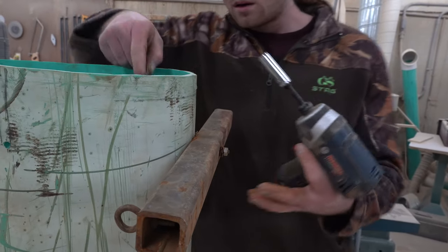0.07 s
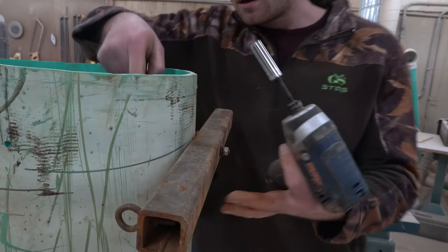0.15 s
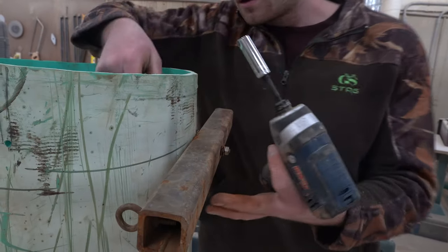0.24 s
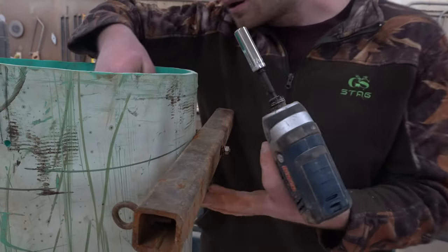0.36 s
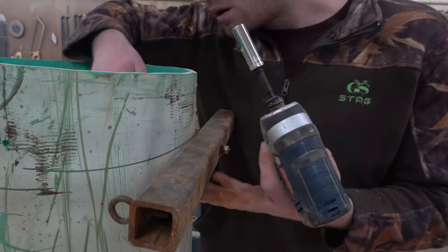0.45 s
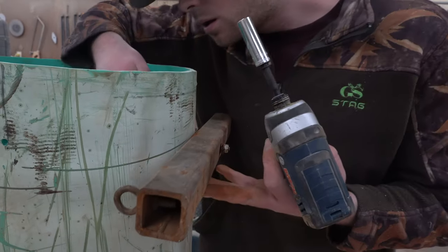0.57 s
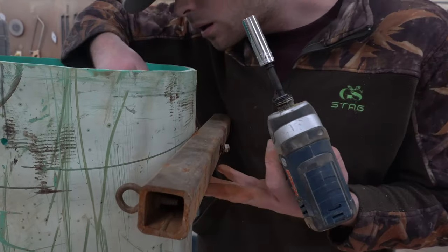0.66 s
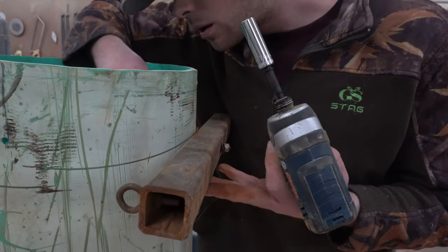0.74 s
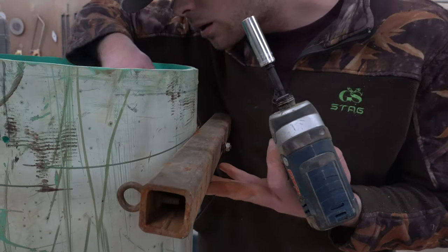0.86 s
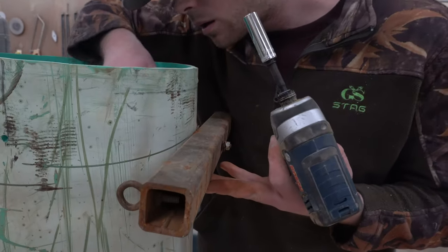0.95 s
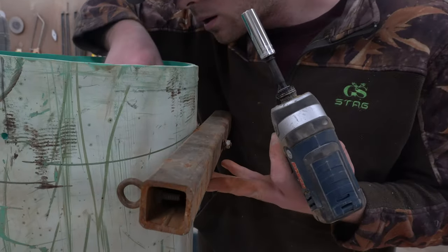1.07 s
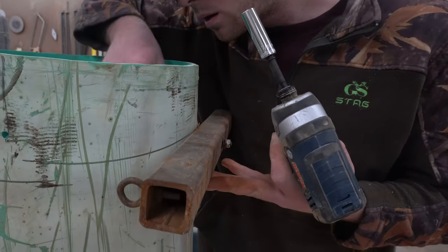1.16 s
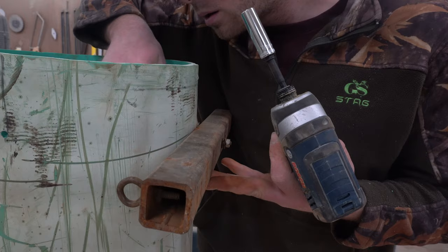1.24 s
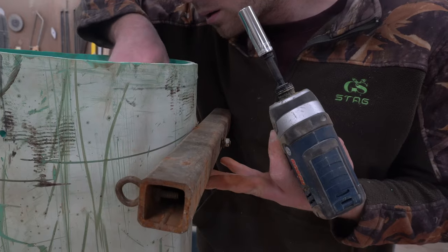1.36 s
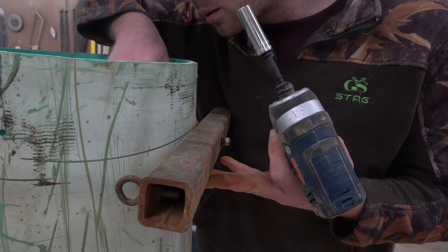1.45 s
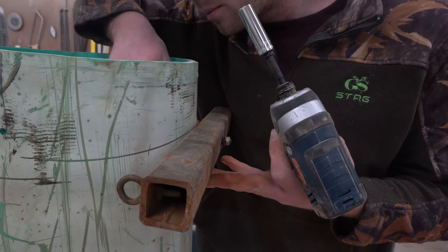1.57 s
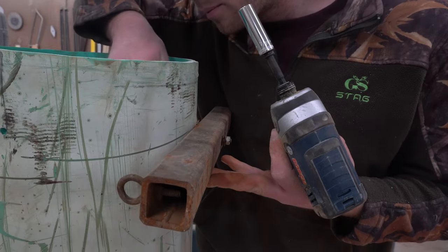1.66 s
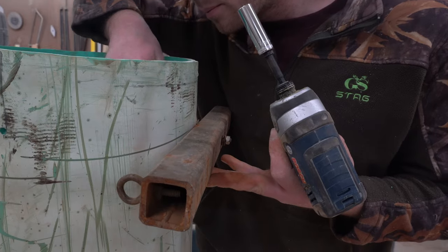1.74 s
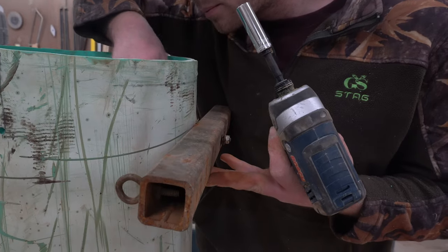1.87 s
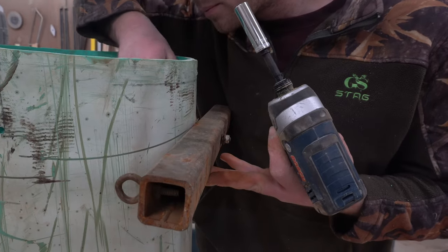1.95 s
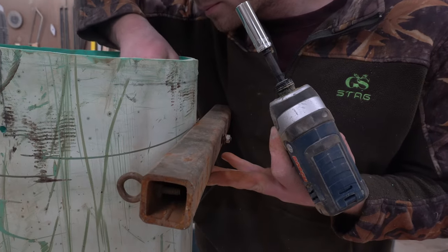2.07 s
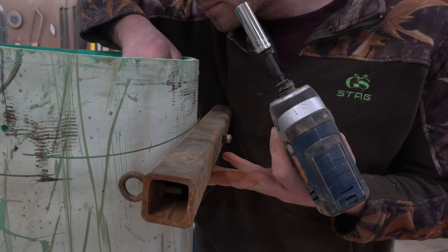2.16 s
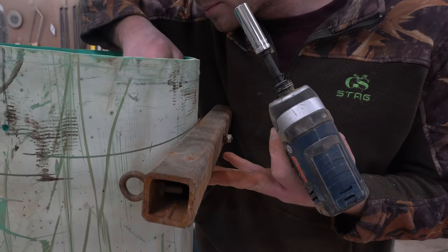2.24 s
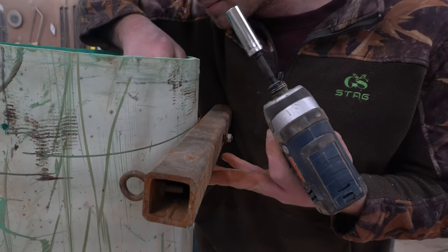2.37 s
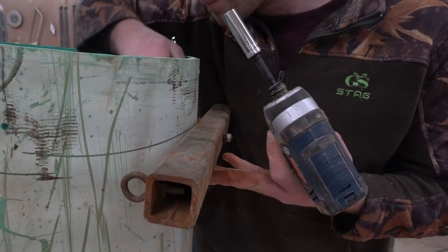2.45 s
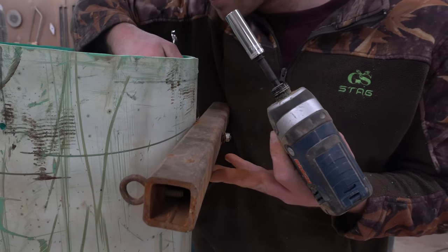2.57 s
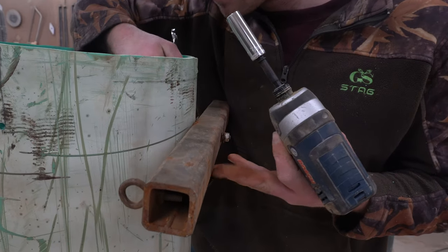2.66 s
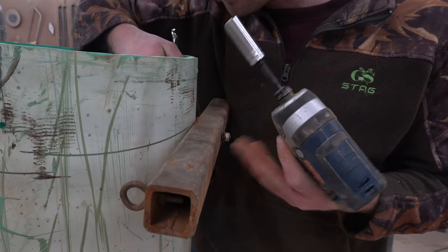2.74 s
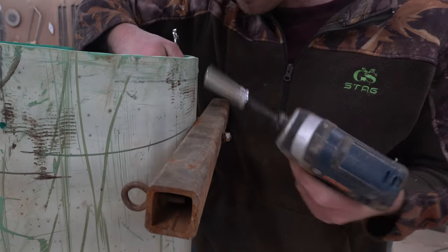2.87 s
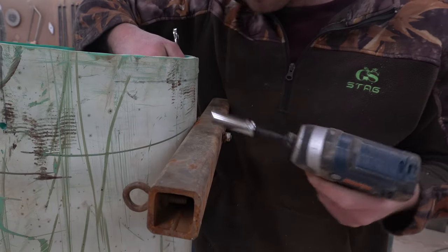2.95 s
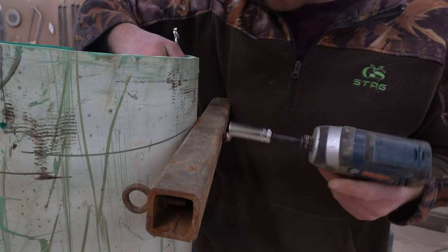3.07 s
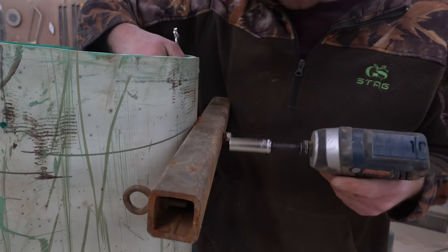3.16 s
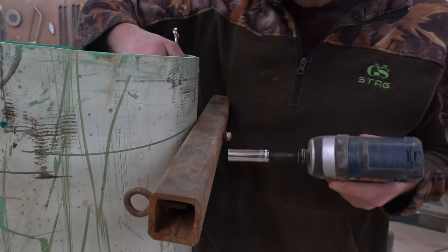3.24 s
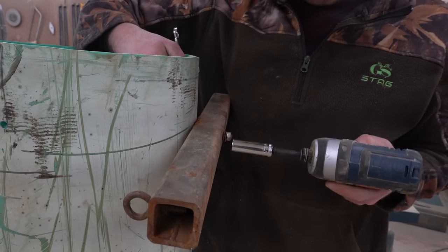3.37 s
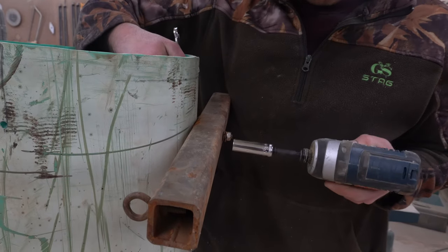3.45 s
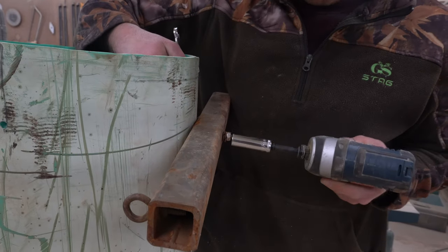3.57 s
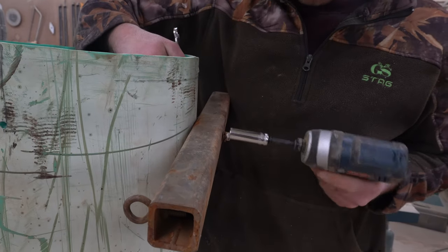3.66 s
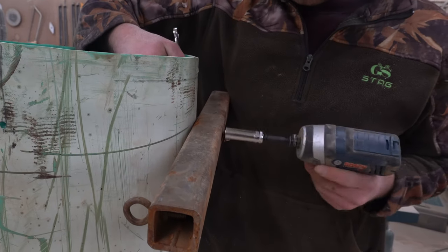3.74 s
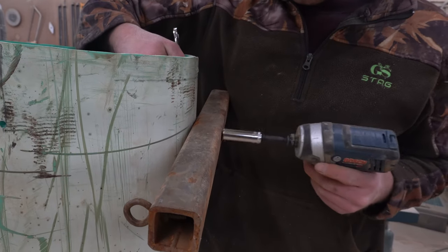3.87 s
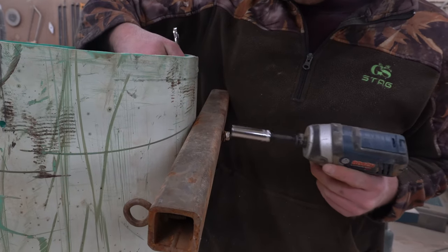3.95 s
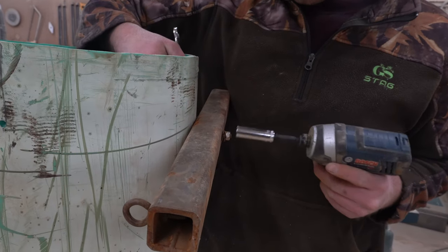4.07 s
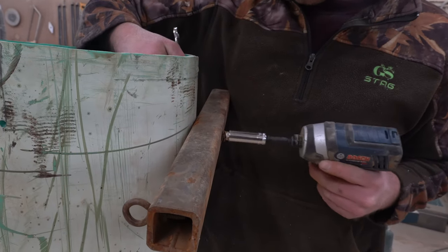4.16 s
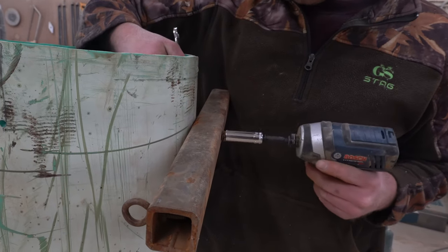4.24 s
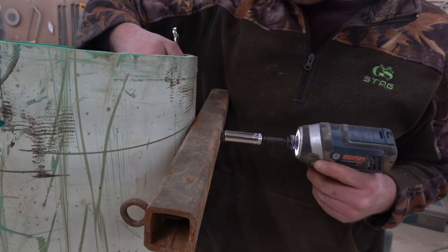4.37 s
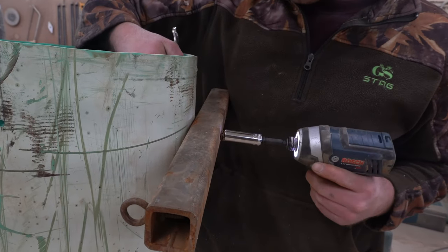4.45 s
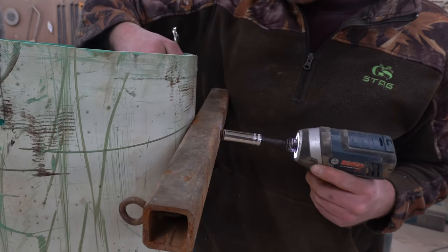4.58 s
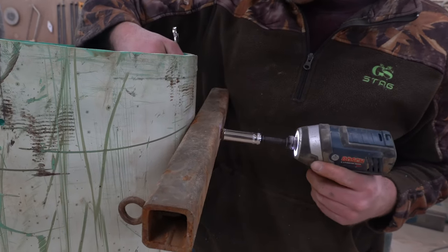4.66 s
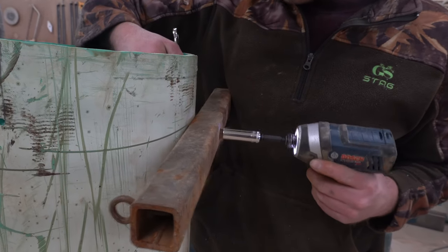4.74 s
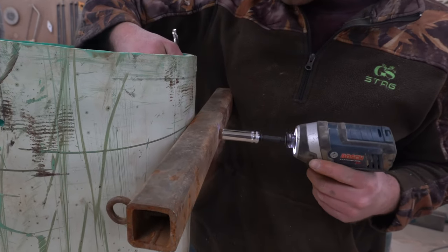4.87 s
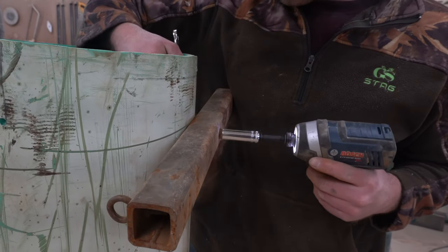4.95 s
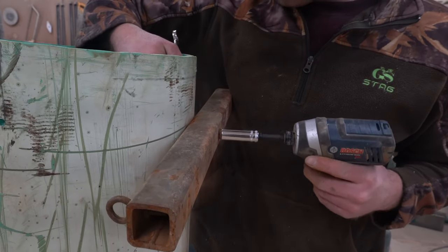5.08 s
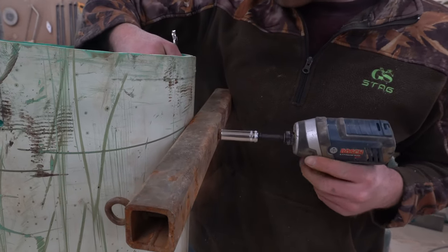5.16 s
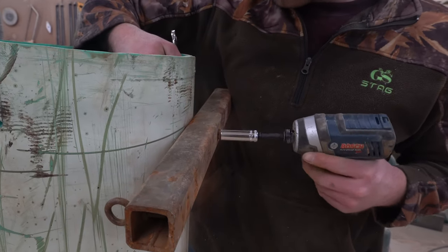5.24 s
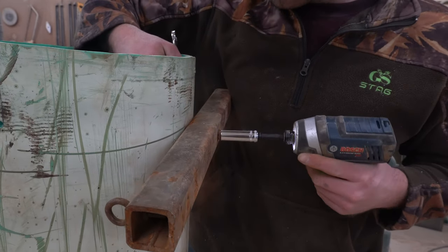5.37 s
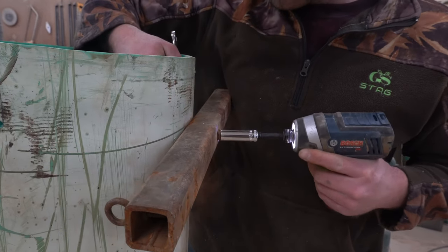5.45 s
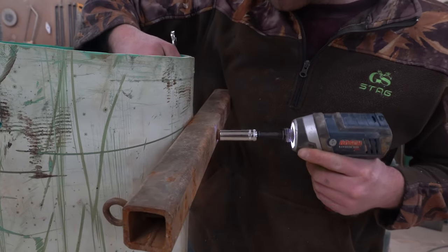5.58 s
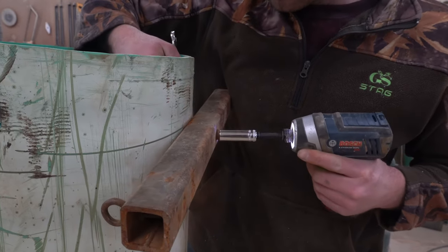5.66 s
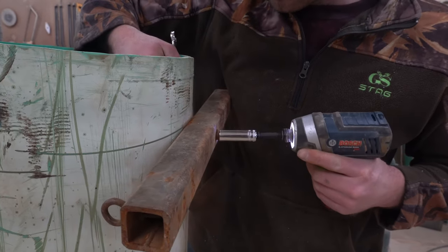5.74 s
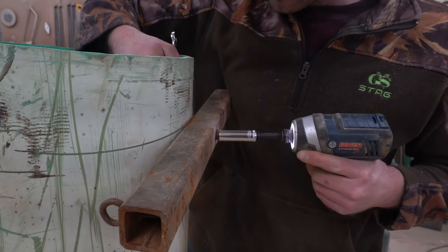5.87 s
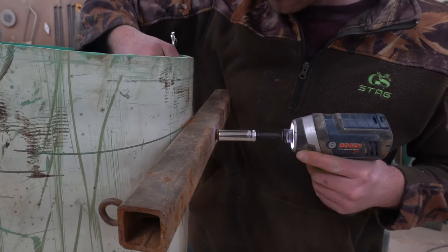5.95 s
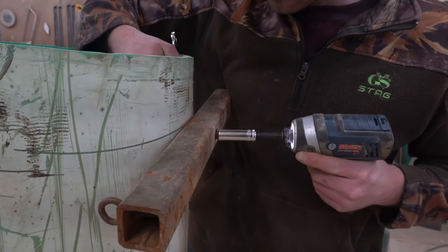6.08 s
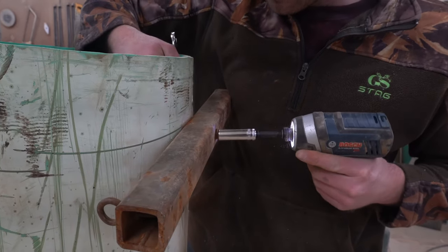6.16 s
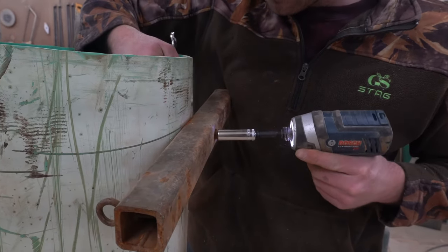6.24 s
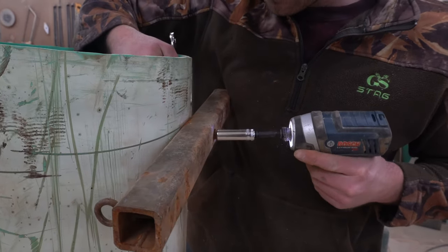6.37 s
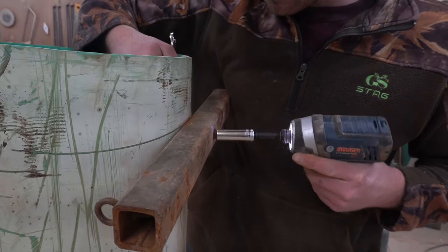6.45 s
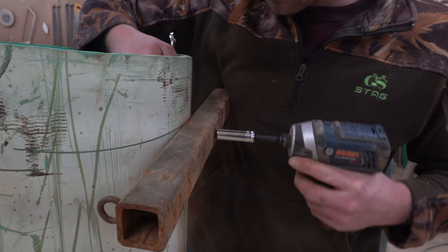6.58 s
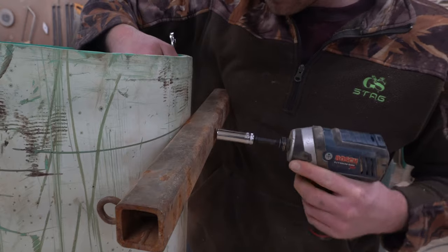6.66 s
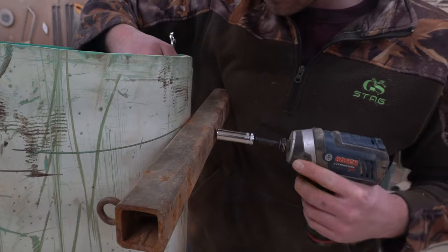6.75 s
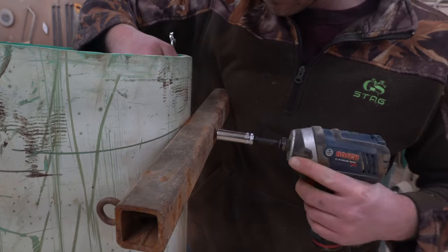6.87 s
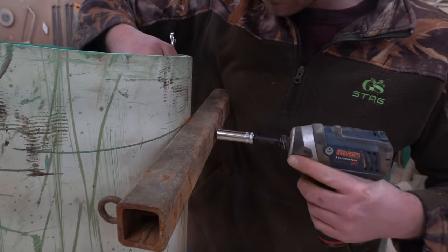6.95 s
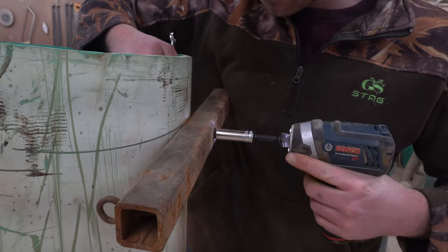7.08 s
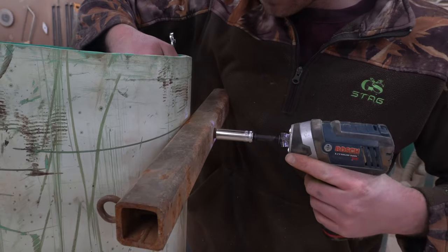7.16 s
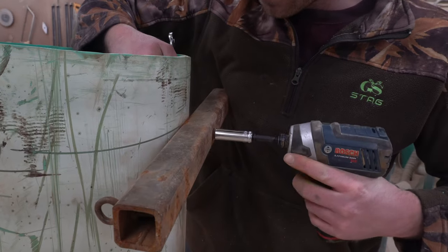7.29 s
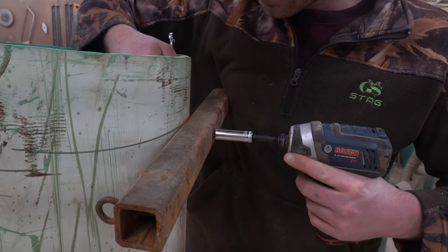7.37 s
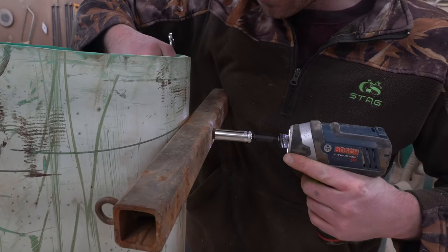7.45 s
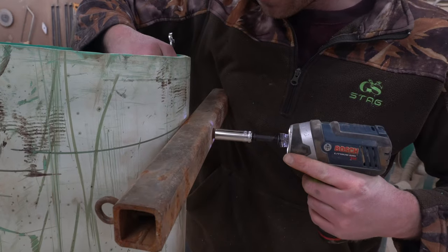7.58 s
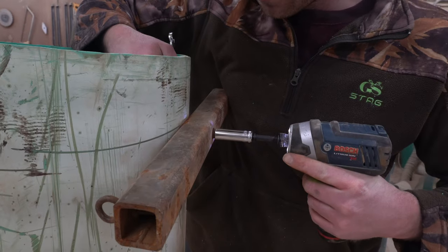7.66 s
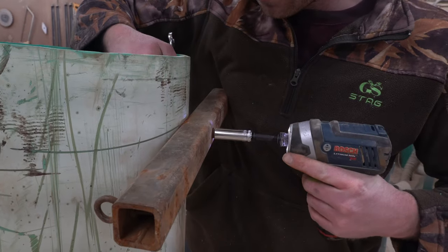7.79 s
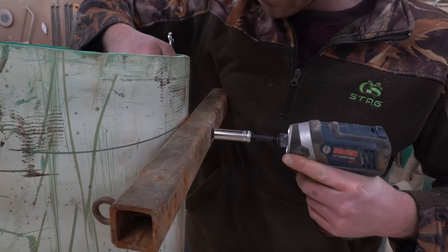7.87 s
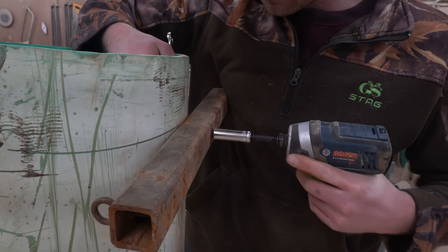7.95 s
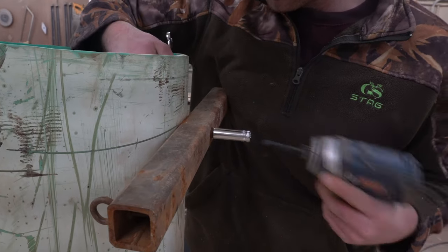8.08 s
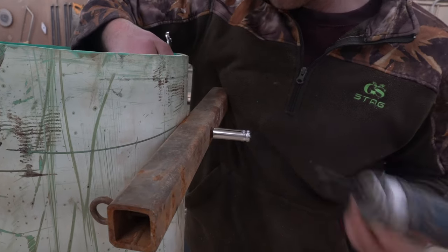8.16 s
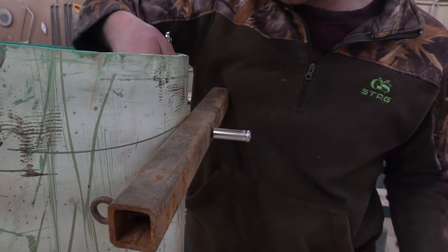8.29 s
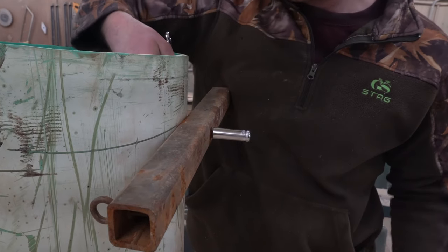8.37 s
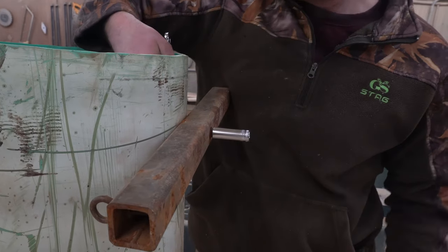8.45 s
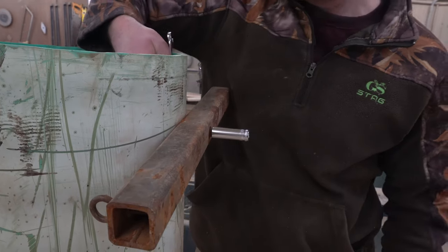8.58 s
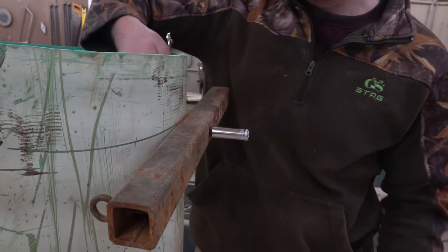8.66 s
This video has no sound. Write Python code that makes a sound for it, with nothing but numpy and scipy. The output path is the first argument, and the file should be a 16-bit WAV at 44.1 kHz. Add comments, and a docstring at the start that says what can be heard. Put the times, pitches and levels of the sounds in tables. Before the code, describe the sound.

A spanner and socket click on steel in a hard workshop, then a cordless impact driver hammers a nut tight in four harsh bursts.

```python
"""A cordless impact driver hammers a nut tight on a bolt through a square steel tube clamped to a plastic drum.
Each blow is a noise crack plus ringing steel modes; the tube, housing and a hard workshop ring on with it.
The motor is shaped noise and gliding tones: rattle, growl, whirr, whine and squealing thread.
Before that a spanner and the socket click on the steel, and a sleeve rustles and squeaks on the drum.
At the end the driver is put down; a faint room hiss sinks away as the hammering starts."""
import sys
import numpy as np
from scipy import signal
from scipy.fft import rfft, irfft
from scipy.io import wavfile
from scipy.ndimage import uniform_filter1d

SR = 44100
rng = np.random.default_rng(int(sys.argv[2]) if len(sys.argv) > 2 else 0)


def store_wav(level_fs):
    """Save 16-bit WAV to argv[1]."""
    pcm = np.round(np.clip(np.atleast_2d(level_fs), -1, 1) * 32767)
    wavfile.write(sys.argv[1], SR, pcm.T.astype(np.int16))


N = 384552
T = np.arange(N) / SR  # time in seconds

# every blow of the hammer, one list a trigger pull:
# t/s, level/dB, body/dB and top/dB (offsets of low and high range), left minus right/dB
HAMMER_BLOWS = [
    [(4.595, -17.5, 11.5, -1.5, 1), (4.6344, -9.5, 7.5, -6, 3.5), (4.6654, -10, 0.5, -2, -4),
     (4.6977, -16, -2, 3, -5), (4.7262, -12.5, -7, -2.5, -3), (4.7571, -13, -0.5, 0.5, -4.5),
     (4.789, -13, 0, 10, -1.5), (4.8199, -9, 6, 0, 1.5), (4.8469, -16.5, 6, 2.5, 4),
     (4.8718, -10, -8, 0.5, 1.5), (4.8958, -13, 1.5, 3, -1.5), (4.9182, -14.5, -10.5, 0.5, 2.5),
     (4.9407, -16, -10.5, 0.5, -1), (4.9621, -8, -6.5, -2, 1), (4.9836, -15, -10, 2, 1.5),
     (5.005, -8, -11.5, 0, 2), (5.027, -13, -6, 1, 3.5), (5.0484, -17, 0.5, 5.5, 3),
     (5.0699, -13.5, 0.5, -3, 2), (5.0918, -12, 5.5, 7.5, 0.5), (5.1143, -13, 4.5, 0.5, 2.0),
     (5.1402, -15, 5, -1, 1), (5.1701, -9, 9.5, 2, -1.5)],
    [(5.6358, -15, 6.5, -2.5, 1), (5.6697, -13.5, 9, -5.5, 3.5), (5.6967, -13.5, 4, -10, 2.5),
     (5.7201, -15, -6.5, 7, 2.5), (5.7431, -18.5, 3.5, 1.5, 0.5), (5.765, -14, 0.5, 4.5, 3),
     (5.7875, -21.5, 1.5, -2, 4), (5.8099, -19.5, -3, 9.5, 2), (5.8329, -13, 1.5, 2.5, 4.5),
     (5.8543, -20, 5.5, -1.5, 5.5), (5.8768, -11.5, -3, 1, 4), (5.8987, -14, -5, 1, 7.5),
     (5.9212, -19, 0, 8, 4.5), (5.9431, -13, -5.5, 5, 7), (5.9646, -15, 1.5, -5, 4),
     (5.9875, -14.5, -1, 1, 2), (6.0095, -12.5, -2, -3.5, 0.5), (6.0309, -12, 3, -3.5, 4.5),
     (6.0524, -12.5, -2.5, -2, 1.5), (6.0748, -17, -3, 1.5, 2), (6.0978, -10.5, 0, -5, 0),
     (6.1197, -12.5, 1, -1.5, -1.5), (6.1417, -11, 3, -4.5, 3), (6.1656, -8.5, -6.5, -4, 3),
     (6.1861, -11.5, -1, 1, 3), (6.209, -19, 13, 3.5, 1.5), (6.233, -10, -12, -2.5, -0.5),
     (6.2534, -10, -9.5, -3.5, 2.5), (6.2764, -11.5, 1.5, 0.5, 3), (6.3013, -10.5, -1, -2.5, 2),
     (6.3238, -14.5, -3, -6, -2), (6.3462, -12.5, 2.5, -3.5, 1.5), (6.3692, -8, -2, -10, 1.5),
     (6.3886, -12.5, 4.5, 0, 4.5), (6.4135, -16, 5, 6.5, 1), (6.4365, -9.5, -9, -2, 3),
     (6.4599, -15, -12, -1, 1), (6.4829, -11, -4, -6.5, 1.5), (6.5033, -11.5, 6.5, 0, 2.5),
     (6.5263, -13.5, 8.5, 3, 0), (6.5507, -12.5, -13, -3.5, 0), (6.5747, -16.5, -9, 4, 3.5),
     (6.5971, -19, -6, 7.5, 3), (6.6176, -10.5, 4, -10, 0.5), (6.649, -19, 13, -10, -1)],
    [(7.3228, -18.5, -2.5, 3, 3.5), (7.3577, -14, 10.5, -1.5, -3)],
    [(7.7059, -15, 0, -2.5, 3), (7.7428, -9, 3, -3, 2.5), (7.7677, -14.5, 5, 1, 4.5),
     (7.7922, -11, -5.5, -1.5, 0.5), (7.8146, -12.5, -8.5, -4, 4.5), (7.8366, -9, 2.5, -1, 4),
     (7.861, -11, 7.5, -0.5, 3.5), (7.8855, -8, 0.5, -8, -2), (7.9044, -12, -3.5, 2, 3),
     (7.9299, -7, 5, -2.5, 2), (7.9538, -14, -1.5, -1.5, 4), (7.9773, -10.5, -19, -13.5, 3.5),
     (7.9977, -11.5, 9.5, 1.5, 1)],
]
# the hammer bouncing between blows: t/s, level/dB, top offset/dB
HAMMER_BOUNCES = [(4.6572, -7, -11.5), (4.6744, -17.5, -3.5), (4.705, -18.5, -2), (4.739, -23, -6.5),
                  (4.768, -18.5, -9.5), (4.7979, -11.5, 0.5), (5.1853, -12, -7.5), (5.649, -19.5, -11),
                  (5.66, -15, -11), (6.2403, -14, -13.5), (6.378, -20.5, -15), (6.398, -15, -20),
                  (7.3138, -31, -13), (7.3342, -28, -7.5), (7.3467, -20, -13), (7.3741, -23.5, -6.5),
                  (7.823, -22, -12), (7.8925, -13.5, -12), (7.9851, -12.5, -15.5), (8.0159, -15, -14.5)]
BOUNCE_BODY_DB, BOUNCE_PAN_DB = 6, 1  # low-range offset; left minus right


def hammer():
    """All blows and bounces in time order; bounces share one body offset and one pan."""
    rows = [(s, db, BOUNCE_BODY_DB, top, BOUNCE_PAN_DB) for s, db, top in HAMMER_BOUNCES]
    rows += [tuple(blow) for pull in HAMMER_BLOWS for blow in pull]
    return sorted(rows)


# ringing of socket, bolt and drum wall: f/Hz, level/dB, t60/s (time to fall by 60 dB)
STEEL_MODES = [(372.5, -23, 0.14), (970, -15, 0.24), (920, 0, 0.036), (1026, -6, 0.065), (1300, -22, 0.066),
               (1486, 2.5, 0.016), (2020, -24, 0.017), (2520, -25, 0.022), (3280, -31, 0.033),
               (3770, -11, 0.041), (4860, -2, 0.03), (5230, 9.5, 0.0076), (5994, 17, 0.0042),
               (7050, -1, 0.015), (7870, 12, 0.006), (12500, -20, 0.037)]
BLOW_T60_S = 0.007  # base fall time of the crack


def hammer_blows(rows):
    """A blow cracks and rings the steel; each new contact chokes the ring before it."""
    rows = [row + (BLOW_T60_S,) for row in rows]
    return strike(rows, STEEL_MODES, tick=1, detune=DETUNE, free_s=.001, scatter_db=5, rise_s=0.00089, swell=4.54,
                  body_db=-23, top_db=.5, ring_db=-15.0, body_slower=2.8, top_quicker=1)


# contacts that land so that one mode sings out: t/s, f/Hz, extra level/dB
SINGING_MODES = [(1.55, 4145, 7), (1.667, 3160, 2), (1.667, 7779, 14.5), (1.667, 11030, 9),
                 (1.983, 4530, 4.5), (1.983, 5180, 13), (2.026, 4145, -9), (2.072, 970, 5.5),
                 (2.072, 1500, 8), (3.812, 3235, 12.5), (3.812, 7960, 15.5), (3.828, 7400, 6),
                 (3.828, 7960, 14), (3.828, 9880, 4), (3.902, 3600, 14.5), (3.929, 5120, 19),
                 (3.929, 4000, 6), (3.929, 7400, 2), (4.27, 7400, 6.5), (4.27, 9880, 13),
                 (4.334, 7400, 11.5), (4.334, 9880, 10.5), (4.454, 3600, 14.5), (4.872, 1036, 9.5),
                 (5.17, 3820, -1.5), (5.482, 3600, 14.5), (6.241, 1489, 12), (6.253, 1489, 15.5),
                 (6.376, 1489, 13), (6.389, 2130, 10), (6.397, 929, 4.5), (7.149, 4010, 14),
                 (8.12, 4900, 4), (8.421, 3235, 6.5)]
DETUNE = .012  # share by which a grip or contact shifts a mode, at most about this
BODY_RISE_SLOWER, CRACK_LOW_HZ = 7.46, 700  # slower start of the low range; low cut of the other two


def strike(rows, modes, rise_s, tick, detune, body_db, top_db, ring_db, body_slower, top_quicker, scatter_db,
           swell, free_s):
    """Each hit: a noisy crack in three ranges that die at their own pace, and modes that ring until the next hit.

    Rows: t/s, level/dB, body/dB, top/dB, left minus right/dB, t60/s; body_db and top_db are added to the offsets.
    A rattle t60 shorter than free_s means the parts stay pressed together, which damps the ring.
    """
    out, crack, noise = np.zeros((2, N)), np.zeros((2, N)), pair(N)
    ranges = [band(noise, 300, 1500), band(noise, 1500, 5500), band(noise, 5500, 11500)]
    hz, mode_db, mode_t60 = np.transpose(modes)[:, :, None]
    sign = (-1) ** np.arange(len(modes))[:, None]  # neighbouring modes swing against each other
    ends = [row[0] for row in rows[1:]] + [T[-1]]
    chances = rng.uniform(-1.1, 1, (len(rows), 2, len(modes), 1))
    for (s, db, body, top, pan, t60), end, (luck, shift) in zip(rows, ends, chances):
        i = int(s * SR)
        sides = undb(np.array([[pan], [-pan]]) / 2)
        parts = zip(ranges,
                    (body + body_db, 0, top + top_db),
                    (t60 * body_slower, t60, t60 * top_quicker),
                    (rise_s * BODY_RISE_SLOWER, rise_s, rise_s),
                    (out, crack, crack))
        for part_noise, part_db, decay, rise, layer in parts:
            t = T[:min(N - i, SR // 3, int(4 * decay * SR))]
            # a sharp tick, then the rattle of loose parts
            fall = undb(-60 * t / (tick * decay))
            fall = fall + .4 * undb(-60 * t / decay) + .1 * undb(-60 * t / (4 * decay))
            burst = fall * np.minimum(t / rise, 1) ** 2 * part_noise[:, i:i + len(t)]
            layer[:, i:i + len(t)] += sides * undb(db + part_db) * burst / np.abs(burst).max()
        t = T[:min(N - i, SR // 3, int((end - s + .004) * SR))]
        colour = np.interp(np.log(hz), np.log([700, 3000, 9000]), [body, 0, top / 2])
        # each hit lands a little differently, more so for the short waves
        scatter = scatter_db * luck * np.clip(hz / 900, 0, 1)
        pressed = min(t60 / free_s, 1) ** 2
        gain_db = db + colour + mode_db + ring_db + scatter - 60 * t / (mode_t60 * pressed)
        for when, sung_hz, more_db in SINGING_MODES:
            if abs(when - s) < .004:
                gain_db += more_db * (abs(hz / sung_hz - 1) < .02)
        rising = 1 - np.exp(-(np.maximum(hz, 900) * t / swell) ** 2)  # swell is in cycles, above 900 Hz
        waves = np.sin(2 * np.pi * hz * (1 + detune * shift) * t)
        ring = np.sum(sign * rising * undb(gain_db) * waves, axis=0)
        choke = np.clip((end - s + .004 - t) / .004, 0, 1)  # the next contact stops the ring
        out[:, i:i + len(t)] += sides * ring * choke
    out += signal.sosfilt(signal.butter(2, CRACK_LOW_HZ, "highpass", fs=SR, output="sos"), crack)
    return signal.sosfilt(signal.butter(1, 120, "highpass", fs=SR, output="sos"), out)  # the hits carry little deep bass


# the slow modes of the tube: f/Hz, t60/s
TUBE_MODES = [(696, .4), (795, .4), (2846, .55), (5120, .4), (7432, .22), (9833, .12), (12724, .1)]
# how strongly the blows ring them as the nut tightens, one list a pull: t/s, then level/dB of each mode
TUBE_LEVELS = [
    [(4.6, -69, -66, -38.5, -44, -50, -51, -61.5), (4.789, -55, -61, -59.5, -56, -55, -46, -52),
     (4.798, -59, -50, -64.5, -49, -52.5, -38, -33), (4.82, -61, -42, -71, -59, -54, -44, -46.5),
     (4.892, -53, -63, -64.5, -51.5, -55, -55, -56.5), (5.036, -44, -70.5, -50.5, -44.5, -37.5, -43.5, -56),
     (5.19, -38, -58, -43, -52, -44, -42, -64.5)],
    [(5.64, -38.5, -50.5, -55.5, -43.5, -45, -54, -63.5), (5.696, -55, -50, -51, -55.5, -46, -57.5, -57),
     (5.78, -45.5, -43, -49, -61, -43, -46.5, -56), (6.554, -47.5, -57.5, -46.5, -59.5, -44, -41.5, -54),
     (6.65, -46, -51.5, -50.5, -53, -42.5, -59, -63.5)],
    [(7.32, -59.5, -60.5, -58, -46.5, -40.5, -57, -67), (7.336, -58, -49.5, -56.5, -57.5, -48, -56, -66),
     (7.362, -44.5, -49.5, -61, -53.5, -37, -41.5, -64), (7.38, -44, -35.5, -63.5, -65.5, -46, -49, -64)],
    [(7.71, -51, -49, -59, -57, -38, -50, -66), (7.744, -41, -53, -61, -42.5, -42, -41.5, -64),
     (7.796, -56.5, -64.5, -48.5, -54, -57, -39, -59), (7.84, -47, -50, -55, -59, -37, -39.5, -61),
     (8.02, -40, -39, -49, -53.5, -58, -43.5, -56)],
]
TUBE_SLIP_RAD, TUBE_SCATTER_DB = 1.3, 3.5  # typical chance change of phase and level at each blow


def tube(blow_s):
    """Every blow renews the slow modes of the tube, out of step; after the last one they ring out."""
    rows = np.concatenate(TUBE_LEVELS)
    last = np.maximum(np.searchsorted(blow_s, T) - 1, 0)
    since, out = np.maximum(T - blow_s[last], 0), 0
    luck = rng.standard_normal((len(blow_s), len(TUBE_MODES), 2))
    for (hz, t60), level_db, (size, slip) in zip(TUBE_MODES, rows.T[1:], luck.transpose(1, 2, 0)):
        size[np.diff(blow_s, append=T[-1]) > .1] = 0  # no level scatter before a pause
        kick_db = np.interp(blow_s, rows[:, 0], level_db) + TUBE_SCATTER_DB * size
        phase = np.cumsum(TUBE_SLIP_RAD * slip)
        wave = np.sin(2 * np.pi * hz * T + phase[last])
        out = out + np.sqrt(2) * undb(kick_db[last] - 60 * since / t60) * wave
    return out * (T > blow_s[0]) * undb([[1.5], [-1.5]])


# hollow modes of the driver: f/Hz, level/dB, t60/s
HOUSING_MODES = [(139, -11, 0.089), (188, -9, 0.15), (227, -0.5, 0.19)]


def hum():
    """Every blow thumps the hollow housing; evenly spaced blows blend into a hum."""
    kicks = np.zeros(N)
    for blows, db in zip(HAMMER_BLOWS, np.transpose(TRIGGER_PULLS)[4]):
        kicks[(np.array(blows)[:, 0] * SR).astype(int)] = undb(db)
    out = 0
    for hz, db, t60 in HOUSING_MODES:
        pole = np.exp(2j * np.pi * hz / SR - np.log(1000) / (t60 * SR))
        out = out + undb(db) * signal.lfilter([1], [1, -pole], kicks).imag
    return out


# colour of the gear rattle: f/Hz, level/dB (per Hz, relative)
GEAR_COLOUR = [(35, -70), (60, -23), (156, -5), (220, -1.5), (291, -19), (359, -3.5), (443, -11.5),
               (953, 6.5), (1200, 5), (1550, -4), (6560, -3.5), (7540, -1.5), (15500, -13.5)]
CREEP_DB, GROWL_CREEP_DB = -30.5, -27.5  # start of the squeeze, relative to free-running
RATTLE_FREE_DB, GROWL_FREE_DB = -20.5, -8.5  # free-running, relative to the bite
BITE_DB = 2  # rattle at the bite, relative to held


def gear_noise(blow_s):
    """Loose gears rattle, shaken by the blows, over a growl of mid-range noise that flickers."""
    gears, growl = coloured(GEAR_COLOUR), unit(band(band(pair(N), 1000, 4700), 1000, 4700))
    _, rattle_db, growl_bite_db, growl_db, _, _ = np.transpose(TRIGGER_PULLS)
    rattle_gain = effort(CREEP_DB, RATTLE_FREE_DB, rattle_db + BITE_DB, rattle_db)
    growl_gain = effort(GROWL_CREEP_DB, GROWL_FREE_DB, growl_bite_db, growl_db)
    rattle = rattle_gain * shaken(blow_s) * flicker(150, 5) * gears
    return rattle + growl_gain * flicker(250, 5) * flicker(25, 8) * growl


# trigger pulls: t/s of the squeeze, rattle held level/dB, growl at the bite level/dB, growl held level/dB,
# housing thump level/dB, drive whine level/dB
TRIGGER_PULLS = [(4.549, -31, -30, -45, -56, -52), (5.551, -31.5, -38, -91, -43.5, -72),
                 (7.21, -33.5, -45, -45.5, -47, -76), (7.62, -31.5, -35, -52, -46.5, -76)]
SPIN_UP_S, SETTLE_S = 0.019, 0.33  # free-running this long before the bite; longest settling after it
RUN_ON_S, LET_GO_S = .035, .015  # running on after the last blow; length of the final surge
LET_GO_DB, STOP_DB = 2.5, -6  # surge and stop, relative to held


def effort(creep_db, free_db, bite_db, held_db):
    """Gain over the pulls: creep, spin up, bite at the first blow, settle, surge as the load comes off."""
    out = 0
    for pull, blows, at_bite, held in zip(TRIGGER_PULLS, HAMMER_BLOWS, bite_db, held_db):
        bite, stop = blows[0][0], blows[-1][0] + RUN_ON_S
        free, settled = at_bite + free_db, min(bite + SETTLE_S, stop - 2 * LET_GO_S)
        shape = [(pull[0], free + creep_db), (bite - SPIN_UP_S, free), (bite, at_bite), (settled, held),
                 (stop - 2 * LET_GO_S, held), (stop - LET_GO_S, held + LET_GO_DB), (stop, held + STOP_DB)]
        out = out + undb(curve(shape, 1))
    return out


RATTLE_SAG_DB, RATTLE_SAG_S = -7, .016


def shaken(blow_s):
    """Gain that jumps at each blow and sags until the next, as shaken parts calm down."""
    last = blow_s[np.maximum(np.searchsorted(blow_s, T) - 1, 0)]
    return undb(RATTLE_SAG_DB * np.clip(np.abs(T - last) / RATTLE_SAG_S, 0, 1))


# gear teeth whining as the motor speeds up, then labours: t/s, f/Hz, level/dB
GEAR_MESH = [(4.7, 3300, -55), (4.73, 3450, -46.5), (4.79, 3780, -44), (4.85, 3600, -51),
             (4.93, 3310, -49.5), (4.99, 3160, -44.5), (5.06, 3020, -53.5), (5.12, 2840, -54)]


def gear_whine():
    """Meshing teeth make one tone that follows the motor speed, with a small waver."""
    pitch = curve(GEAR_MESH, 1, 3000.) * flicker(240, 0.42)
    return undb(curve(GEAR_MESH, 2)) * flicker(90, 3.5) * tone(pitch)


# the whirr at the first blow of each pull: level/dB
WHIRR_LEVELS = [-39.5, -45.5, -53.5, -50.5]
WHIRR_FROM_HZ, WHIRR_TO_HZ = 2500, 2970
WHIRR_FROM_DB, WHIRR_ROUGH_DB = -23.5, 2.5  # start relative to the end; size of the pitch waver


def whirr():
    """A rough tone that climbs and swells as the motor spins up, from the squeeze to the first blow."""
    rough, out = flicker(400, WHIRR_ROUGH_DB), 0
    for pull, blows, db in zip(TRIGGER_PULLS, HAMMER_BLOWS, WHIRR_LEVELS):
        rows = [(pull[0], WHIRR_FROM_HZ, db + WHIRR_FROM_DB), (blows[0][0], WHIRR_TO_HZ, db)]
        out = out + undb(curve(rows, 2)) * tone(curve(rows, 1, WHIRR_TO_HZ) * rough)
    return out * flicker(140, 5)


WHINE_HZ = 15600


def drive_whine():
    """A very high, narrow band of noise from each squeeze to its first blow."""
    whine, gain = unit(band(rng.standard_normal(N), WHINE_HZ - 60, WHINE_HZ + 60)), 0
    for pull, blows in zip(TRIGGER_PULLS, HAMMER_BLOWS):
        gain = gain + undb(pull[5]) * gate(pull[0], blows[0][0], .01)
    return whine * gain


# the thread squeals as the nut first bites: t/s, length/s, f/Hz at mid-length, level/dB
THREAD_SQUEALS = [(4.628, 0.028, 3230, -22.5), (4.635, .02, 2300, -28), (4.634, 0.051, 1900, -34.5),
                  (4.612, 0.012, 2400, -28.5), (4.678, 0.018, 3700, -25.5), (4.708, 0.016, 3900, -42.5)]
SQUEAL_EDGE_S, SQUEAL_RISE_PER_S = 0.0057, 2.2  # fade; share of its pitch climbed in a second


def thread_squeals():
    """Dry thread squeals in short rising tones that share one waver."""
    waver, out = flicker(150, 0.042), 0
    for s, length, hz, db in THREAD_SQUEALS:
        climb = 1 + SQUEAL_RISE_PER_S * np.clip(T - s - length / 2, -length, length)
        out = out + undb(db) * gate(s, s + length, SQUEAL_EDGE_S) * tone(hz * waver * climb)
    return out


# socket on the nut, trigger: t/s, level/dB, body/dB and top/dB (offsets), left minus right/dB, rattle t60/s
SOCKET_CLICKS = [(3.3535, -48, -2.5, -9, -6, 0.033), (3.8122, -18.5, -22.5, -30, 3.5, 0.082),
                 (3.8283, -26.5, 6, -11, 1.5, 0.035), (3.9025, -26, -10, -14, 3, 0.044),
                 (3.929, -25.5, -6, -23, 0, 0.031), (4.139, -45, -18.5, 5, -1, 0.025),
                 (4.1739, -41, -24, -26, 5, 0.04), (4.1902, -48, -20, 10.5, 8, .023),
                 (4.2621, -16, -23, -37, 6.5, 0.069), (4.2704, -21.5, -10.5, -34, 1, 0.065),
                 (4.3205, -24.5, -12.5, -29.5, 1, 0.12), (4.3344, -32, -0.5, -9.5, -1, 0.028),
                 (4.454, -21.5, -57, -10, -0.5, 0.011), (5.4824, -39, -13, -20, -2, 0.018),
                 (5.527, -48, -14, -15, -1, .02), (5.5486, -33.5, -4, -18, 2, 0.14),
                 (7.098, -61.5, -28, 4, -1, .015), (7.1493, -54, -19.5, -18.5, -2, 0.015),
                 (7.195, -62.5, -20, -25.5, 0, 0.012), (7.2133, -50, -24.5, -37, 0, 0.023),
                 (7.2965, -39, -9.5, -16.5, 2, 0.017), (7.4378, -35, 6, -14.5, 0, 0.047),
                 (7.5344, -38.5, -1.5, -15, 1.5, 0.038), (7.6218, -29, -13.5, 8.5, 0, 0.033),
                 (8.12, -26.5, -5.5, -15, 1, 0.058), (8.4213, -56, -15, -14.5, -4, .03)]
# the loose socket against nut and tube: f/Hz, level/dB, t60/s
SOCKET_MODES = [(440, -24.5, 0.12), (825, 6, 0.05), (1180, 12, 0.05), (1713, -5, 0.2), (3130, -1.5, 0.045),
                (3740, -2.5, 0.047), (3900, -7.5, .08), (5000, -1.5, 0.12), (4960, -18, 0.22),
                (5450, -9, .07), (7340, -9.5, 0.32), (8100, -12, 0.15), (9850, -4, 0.14)]
FREE_T60_S = .045  # contacts that rattle for less than this stay pressed on and damp the ring


def socket_clicks():
    """The loose socket ticks and rings against nut and tube, with a few faint jiggles."""
    return strike(sorted(SOCKET_CLICKS + jiggle()), SOCKET_MODES, tick=.12, detune=DETUNE / 4, free_s=FREE_T60_S,
                  scatter_db=3, rise_s=0.00016, swell=.6, body_db=-3.0, top_db=-8.0, ring_db=-16.5,
                  body_slower=2.8, top_quicker=0.4)


JIGGLE_START_S, JIGGLE_END_S, JIGGLE_COUNT = 3.08, 3.34, 7
JIGGLE_DB = -52.5  # the quietest; chance adds up to 4 dB
JIGGLE_BODY_DB, JIGGLE_TOP_DB, JIGGLE_PAN_DB, JIGGLE_T60_S = -16.5, -2, -16.5, 0.034


def jiggle():
    """The loose socket jiggles at chance moments as the driver is swung round; rows like the clicks."""
    when, size = rng.uniform(0, 1, (JIGGLE_COUNT, 2)).T
    slot_s = (JIGGLE_END_S - JIGGLE_START_S) / JIGGLE_COUNT
    times = JIGGLE_START_S + (np.arange(JIGGLE_COUNT) + when) * slot_s
    return [(s, JIGGLE_DB + 4 * k, JIGGLE_BODY_DB, JIGGLE_TOP_DB, JIGGLE_PAN_DB, JIGGLE_T60_S)
            for s, k in zip(times, size)]


# the spanner knocking inside the drum: t/s, level/dB, body offset/dB, left minus right/dB, rattle t60/s
SPANNER_TAPS = [(0.018, -45, 4.5, 1, 0.017), (0.0678, -44, -10, 4, .04), (1.5504, -25, -16.5, 6, 0.052),
                (1.6668, -15, -23, 5.5, 0.071), (1.982, -16.5, -28, 4, 0.076),
                (2.0261, -14, -19, 4.5, 0.038), (2.0723, -27, 4, 2.5, 0.0066),
                (2.2313, -34.5, 8.5, 1, 0.016), (2.378, -47, 11, 4, 0.028), (2.409, -37, 1.5, 1, .035),
                (2.5043, -47, -29, 12, .05), (2.794, -38.5, 12.5, 1.5, 0.0067), (2.8324, -51, -22, 5, .04)]
# the spanner on the bolt head: f/Hz, level/dB, t60/s
SPANNER_MODES = [(555, -13, 0.061), (703, -11, 0.35), (944, 11, 0.077), (1001, 8, 0.092),
                 (1100, 10.5, 0.034), (1494, 3.5, 0.04), (2090, 8.5, 0.03), (2453, 2.5, 0.042),
                 (3194, 1, 0.062), (4075, 15.5, 0.019), (4140, -3.5, 0.16), (4320, -3, 0.13),
                 (4450, 13, 0.029), (5180, -0.5, 0.11), (6340, 14, 0.047), (7700, 10.5, 0.07),
                 (9800, -9.5, .08), (11100, 6, 0.16), (13600, -2, .08)]
TAP_TOP_DB = -59  # so the crack has almost no top range


def spanner_taps():
    """The spanner knocks on the bolt head inside the drum and rings."""
    rows = [(s, db, body, TAP_TOP_DB, pan, t60) for s, db, body, pan, t60 in SPANNER_TAPS]
    return strike(rows, SPANNER_MODES, tick=.12, detune=DETUNE, free_s=.001, scatter_db=5, rise_s=0.00053,
                  swell=0.59, body_db=-4.0, top_db=0, ring_db=-16.0, body_slower=5.0, top_quicker=0.52)


# the driver laid on the bench: t/s, level/dB, body/dB and top/dB (offsets), left minus right/dB, rattle t60/s
LAID_DOWN = [(8.5948, -47, 15.5, -12.5, 1.5, 0.15), (8.6438, -28, -3, -10, -1.5, 0.016),
             (8.6544, -42, 12, -16, 3, 0.033), (8.6664, -43, 0, -17, -1, 0.029),
             (8.7013, -35.5, 1, -6, -2, 0.04)]
# housing and bench top: f/Hz, level/dB, t60/s
BENCH_MODES = [(615, -5.5, .05), (1014, 2, .06), (1630, 1.5, 0.062), (2150, -4, 0.034), (2650, -3.5, .05),
               (3020, 3.5, .03), (3700, -2, 0.022)]


def laid_down():
    """The driver clatters on the bench; housing and bench top ring briefly."""
    return strike(LAID_DOWN, BENCH_MODES, tick=.12, detune=DETUNE, free_s=.001, scatter_db=3, rise_s=0.00056,
                  swell=0.78, body_db=-1.5, top_db=0, ring_db=-8.5, body_slower=2.1, top_quicker=0.51)


# dull bumps of the drum and the bench: t/s, level/dB (peak), f/Hz, t60/s
DULL_BUMPS = [(2.234, -48, 326, 0.12), (2.796, -47.5, 145, 0.044), (3.829, -45.5, 70.5, 0.17),
              (4.272, -54, 123, 0.1), (8.595, -49.5, 203, 0.1), (8.645, -29.5, 253, 0.04),
              (8.654, -42, 121, 0.078), (8.701, -24, 266, 0.027), (8.707, -32.5, 110, .08)]


def thuds():
    """Soft contacts: one low swing that soon dies."""
    out = np.zeros(N)
    for s, db, hz, t60 in DULL_BUMPS:
        i = int(s * SR)
        t = T[:min(N - i, SR // 2)]
        out[i:i + len(t)] += undb(db - 60 * t / t60) * np.sin(2 * np.pi * hz * t)
    return out


# cloth and hands moving: t/s, level/dB, treble level/dB
CLOTH_RUSTLE = [(0, -60.5, -76), (.03, -46.5, -65), (.13, -55, -64), (.22, -63, -77), (.43, -55, -61),
                (.55, -61.5, -67.5), (.7, -61, -73), (.9, -69, -75.5), (2.3, -73.5, -76), (2.37, -56, -92),
                (2.46, -51.5, -86), (2.55, -64.5, -63), (2.7, -70, -74), (3.05, -71, -76), (3.1, -80, -61),
                (3.27, -68.5, -67.5), (3.6, -70, -77), (3.8, -67, -94)]
# a sleeve catching on the drum wall: t/s, f/Hz, level/dB
SLEEVE_SQUEAK = [(0.615, 400, -84), (0.627, 387, -49), (0.645, 363, -45), (0.665, 374, -44.5),
                 (0.678, 377, -45), (0.69, 378.7, -75)]
# overtones of the squeak: multiple of its pitch, level/dB
SQUEAK_OVERTONES = [(1, -3.5), (2, -20), (3, -21), (4, -21.5)]


def sleeve():
    """Grainy rustle of cloth, and one stick-slip squeak on the plastic with its overtones."""
    rustle = undb(curve(CLOTH_RUSTLE, 1)) * flicker(36, 5.2) * unit(band(pair(N), 300, 2500))
    rustle += undb(curve(CLOTH_RUSTLE, 2)) * flicker(40, 0.89) * unit(band(pair(N), 2700, 8800))
    pitch, squeak = curve(SLEEVE_SQUEAK, 1, 372.), 0
    for k, db in SQUEAK_OVERTONES:
        squeak = squeak + undb(db) * flicker(60, 2.5 * k) * tone(pitch, int(k))
    return rustle + undb(curve(SLEEVE_SQUEAK, 2)) * squeak


# faint whistling: t/s, length/s, f/Hz, width/Hz, level/dB
FAINT_WHISTLES = [(.25, 0.36, 1830, 240, -66.5), (1.442, 0.19, 1700, 240, -62.5),
                  (3.336, 0.45, 4570, 350, -74)]
WHISTLE_EDGE_S = .06


def whistles():
    """A faint whistle as a narrow, wavering hiss."""
    out = 0
    for s, length, hz, width, db in FAINT_WHISTLES:
        hiss = unit(band(pair(N), hz - width / 2, hz + width / 2))
        out = out + undb(db) * gate(s, s + length, WHISTLE_EDGE_S) * hiss
    return flicker(33, 3.8) * out


# how long the workshop rings: f/Hz, t60/s
SHOP_T60 = [(100, 1), (260, 0.63), (700, 0.74), (1840, 0.73), (4850, 0.52), (12800, 0.28)]


def shop(dry, delay_s, wet_db):
    """Dense echoes of the workshop; each half octave dies away at its own pace."""
    size = SR
    t, noise, echo = T[:size], rfft(pair(size)), 0
    steps = 2 * np.log2(np.maximum(np.fft.rfftfreq(size, 1 / SR), 1) / 90)  # half octaves above 90 Hz
    for k in range(16):
        share = np.cos(np.pi / 2 * np.clip(steps - k, -1, 1)) ** 2  # neighbouring shares add up to one
        echo = echo + irfft(noise * share, size) * undb(-60 * t / on_log(SHOP_T60, 90 * 2 ** (k / 2)))
    echo = echo * (1 - np.exp(-(t / delay_s) ** 2))  # the echoes build up softly
    echo *= undb(wet_db) / np.sqrt(np.sum(echo ** 2) / 2)
    return signal.fftconvolve(echo, dry.mean(axis=0)[None], axes=1)[:, :N] * undb([[1.2], [-1.2]])


# the hiss of the room, which sinks away as the hammering starts: t/s, level/dB
HISS_LEVEL = [(0, -68), (4.55, -67), (4.7, -96), (8.72, -95)]
# its colour: f/Hz, level/dB (per Hz, relative)
HISS_COLOUR = [(24, -73), (40, -33.5), (500, -30.5), (627, -2.5), (983, -5.5), (1230, -3.5), (1980, -9.5),
               (2480, -13), (2880, -5.5), (5530, -8), (15800, -12)]


def room_hiss():
    """Steady coloured noise under a slowly changing level."""
    return undb(curve(HISS_LEVEL, 1)) * coloured(HISS_COLOUR)


def undb(db):
    """Decibels to a plain gain."""
    return 10 ** (np.asarray(db) / 20)


def on_log(table, hz):
    """Read a table at any frequency, along a logarithmic scale like the ear's."""
    f, v = np.transpose(table)
    return np.interp(np.log(np.maximum(hz, 1)), np.log(f), v)


def unit(x):
    """Scale to an average (RMS) level of one."""
    return x / np.sqrt(np.mean(x ** 2))


def band(x, lo_hz, hi_hz):
    """Keep only the range between two frequencies."""
    return signal.sosfilt(signal.butter(2, [lo_hz, min(hi_hz, .45 * SR)], "bandpass", fs=SR, output="sos"), x)


# how alike the two microphones hear noise: f/Hz, left-right correlation (1 = the same)
MIC_LIKENESS = [(250, 1), (500, 0.91), (1000, 0.8), (2000, 0.68), (4000, 0.26), (8000, 0.25),
                (12000, 0.083)]


def pair(size):
    """White noise for two microphones: alike in the bass, nearly unrelated in the treble."""
    alike = np.clip(on_log(MIC_LIKENESS, np.fft.rfftfreq(size, 1 / SR)), 0, 1)
    mid, side = rfft(rng.standard_normal((2, size)))
    mid, side = mid * np.sqrt((1 + alike) / 2), side * np.sqrt((1 - alike) / 2)
    return irfft(np.array([mid + side, mid - side]), size)


def coloured(table):
    """Noise whose strength over frequency follows a table."""
    return unit(irfft(rfft(pair(N)) * undb(on_log(table, np.fft.rfftfreq(N, 1 / SR))), N))


def curve(rows, column, off=-130.):
    """Straight lines through the rows of a table, and off outside them."""
    rows = np.array(rows)
    return np.interp(T, rows[:, 0], rows[:, column], off, off)


def flicker(rate, spread_db):
    """Gain that wanders at random within bounds, rate times a second."""
    k = int(SR / rate)
    steps = np.repeat(rng.uniform(-1.2, 1, N // k + 1), k)
    return undb(spread_db * uniform_filter1d(steps, k)[:N])


def tone(hz, multiple=1):
    """A sine of RMS level one that follows a moving pitch."""
    return np.sqrt(2) * np.sin(2 * np.pi * multiple * np.cumsum(hz) / SR)


def gate(start, end, edge_s):
    """Gain that opens and closes with straight edges."""
    return np.clip(np.minimum(T - start, end - T) / edge_s, 0, 1)


TUBE_WET_DB = -6  # the tube's slow modes and the sleeve reach the room more weakly


def scene():
    """Add up all sources and the echoes of the workshop."""
    rows = hammer()
    blow_s = np.array(rows)[:, 0]
    dry = hammer_blows(rows) + socket_clicks() + laid_down() + spanner_taps() + thuds() + whistles()
    dry += gear_noise(blow_s) + gear_whine() + whirr() + thread_squeals() + drive_whine()
    thin = tube(blow_s) + sleeve()
    echoes = shop(dry + undb(TUBE_WET_DB) * thin, delay_s=0.02, wet_db=-10.0)
    return dry + thin + hum() + echoes + room_hiss()


# the two microphones hear the bench differently: f/Hz, left minus right level/dB
MIC_LEAN = [(200, 0), (500, -2), (1000, 2.5), (2000, -3), (4000, 0.3), (8000, 3.5), (12000, -0.5)]
OVERLOAD = 0.27  # peaks are rounded off towards this size
MIC_TOP_HZ, TOP_HZ = 15750, 16700  # two steep high cuts


def record(dry):
    """The microphones lean a little, round off peaks, miss the deepest bass and fade at the top."""
    lean = on_log(MIC_LEAN, np.fft.rfftfreq(N, 1 / SR)) / 2
    dry = irfft(rfft(dry) * undb([lean, -lean]), N)
    dry = OVERLOAD * np.tanh(dry / OVERLOAD)
    dry = signal.sosfilt(signal.butter(2, 130, "highpass", fs=SR, output="sos"), dry)
    dry = signal.sosfilt(signal.cheby1(8, .5, MIC_TOP_HZ, fs=SR, output="sos"), dry)
    return signal.sosfilt(signal.ellip(8, .2, 70, TOP_HZ, fs=SR, output="sos"), dry)


dry = scene()
out = record(dry)
store_wav(out)
```